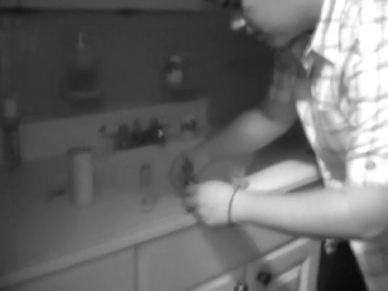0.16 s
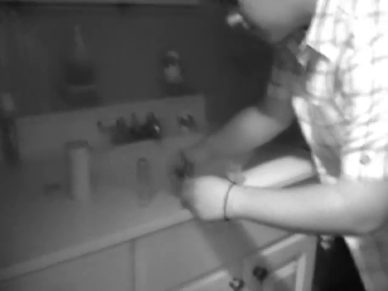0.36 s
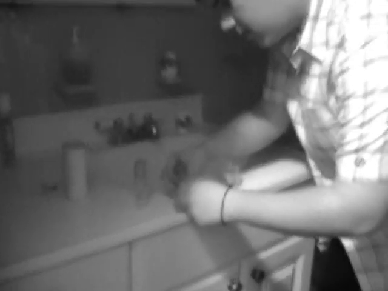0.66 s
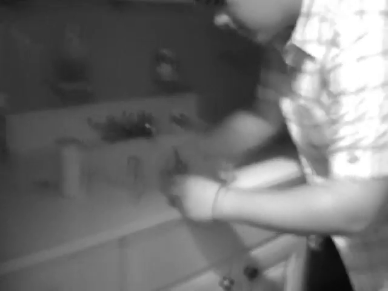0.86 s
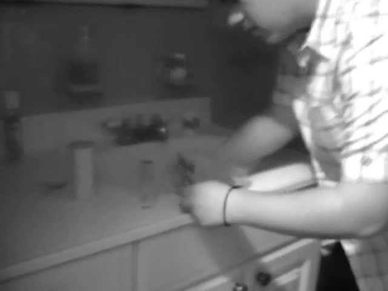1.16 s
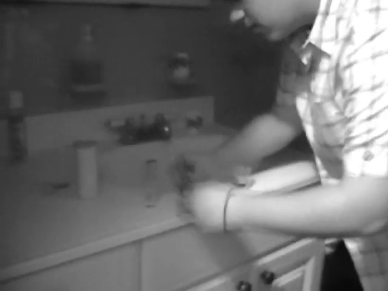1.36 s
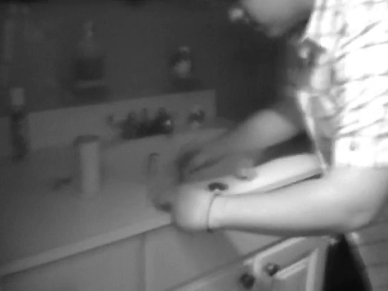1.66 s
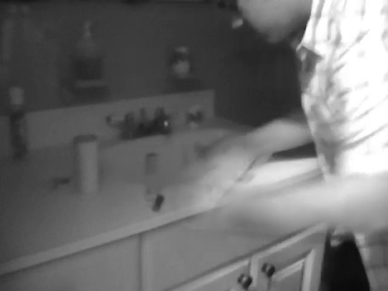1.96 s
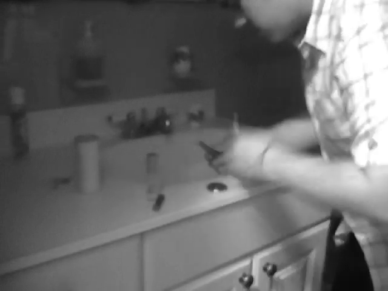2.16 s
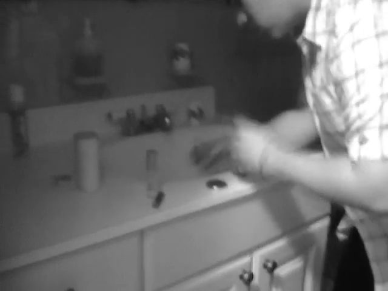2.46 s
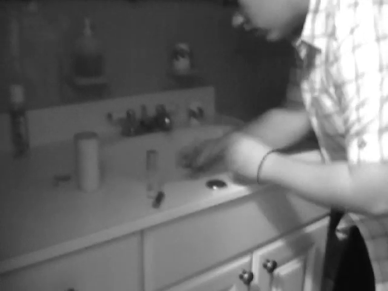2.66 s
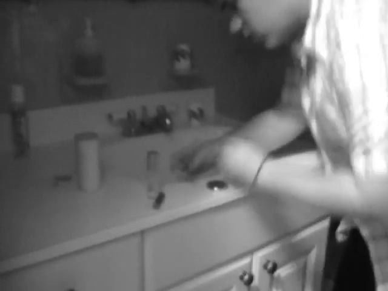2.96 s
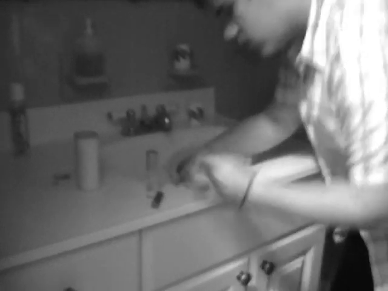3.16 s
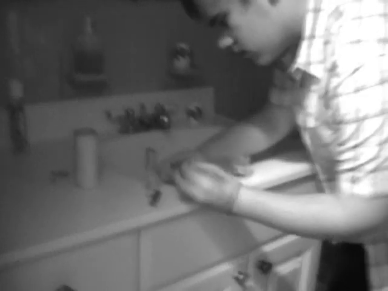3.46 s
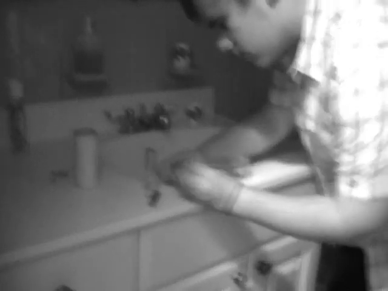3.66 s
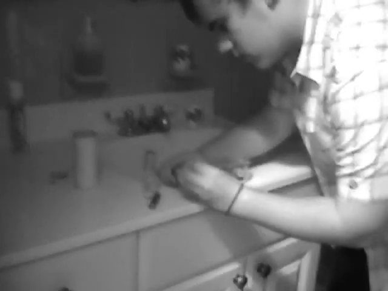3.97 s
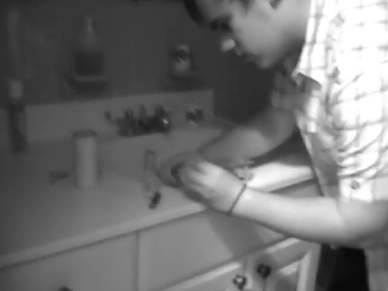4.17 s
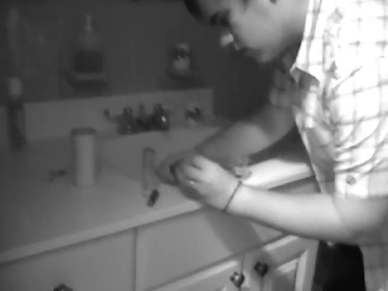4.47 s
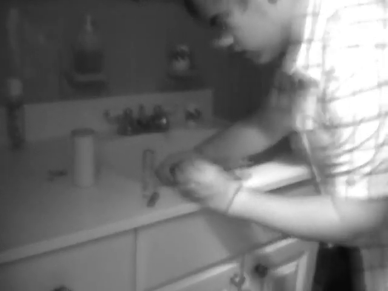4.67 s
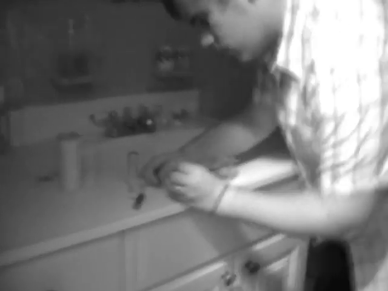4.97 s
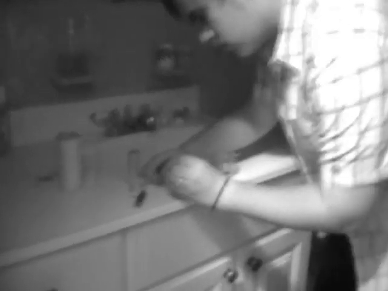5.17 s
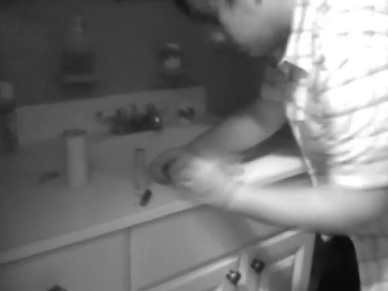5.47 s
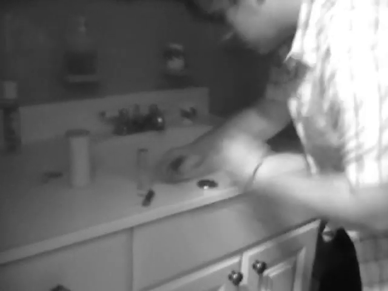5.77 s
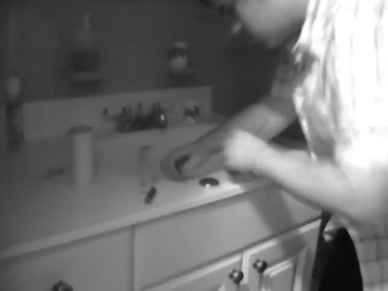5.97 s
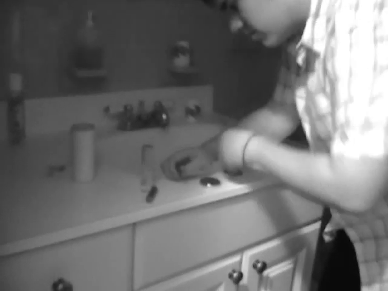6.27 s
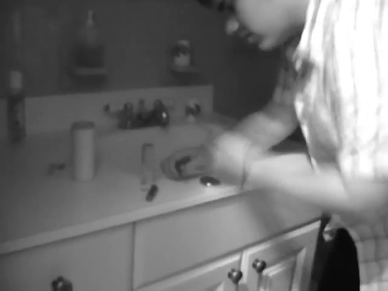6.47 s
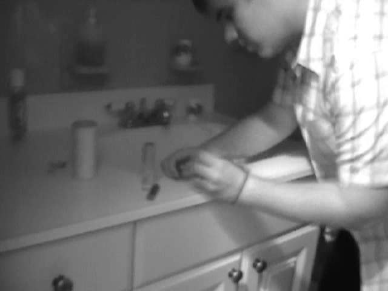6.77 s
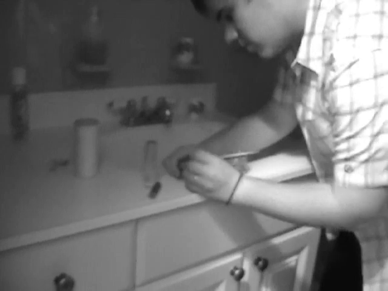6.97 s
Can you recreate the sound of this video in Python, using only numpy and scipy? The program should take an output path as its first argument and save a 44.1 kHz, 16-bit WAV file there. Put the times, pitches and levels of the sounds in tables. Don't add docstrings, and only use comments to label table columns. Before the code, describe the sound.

Someone handles small hard objects at a bathroom counter, recorded close in stereo. Cloth hisses faintly over steady rumble, mains hum and airy duct moan. First comes one dull crack, then a sharp metallic triple tap, then a quick rattling cap with a thin high ring. After a quiet pause of only room tone, the cap rattles down again and its rim clicks as it is picked up.

```python
import sys
import numpy as np
from scipy import signal
from scipy.io import wavfile
from scipy.ndimage import uniform_filter1d

SR = 44100
rng = np.random.default_rng(int(sys.argv[2]) if len(sys.argv) > 2 else 0)


def file_out(sig):
    cols = np.atleast_2d(sig).T
    lim = np.clip(cols, -1, 1)
    pcm = np.round(lim * 32767).astype(np.int16)
    wavfile.write(sys.argv[1], SR, pcm)


def nominal_scale(level):
    x = np.asarray(level, float) / 20
    return 10 ** x


N = 313330


def evened(x):
    return x / np.sqrt(np.mean(x ** 2) + 1e-20)


def read(points, hz):
    f, value = np.transpose(points)
    return np.interp(np.log(hz + 1), np.log(f + 1), value)


def sides(pan_db):
    return nominal_scale(np.array([[pan_db / 2], [-pan_db / 2]]))


def add(mix, start_s, sound):
    part = mix[:, round(start_s * SR):][:, :sound.shape[1]]
    part += sound[:, :part.shape[1]]


# frequency in Hz, left-right difference in dB.
LEAN = [(60, 6), (240, -1.5), (950, 1.0), (3770, 1.5), (15000, 0)]


def noise(colour, same, patchy_db):
    frames, hz = N // 256 + 5, np.fft.rfftfreq(1024, 1 / SR)
    a, b, c, d, patches = rng.standard_normal((frames, 513, 5)).T
    patches = uniform_filter1d(patches, size=8, axis=0)
    patches = evened(uniform_filter1d(patches, size=20, axis=1))
    same = np.clip(read(same, hz), -1, 1)[:, None]
    left = a + 1j * b
    right = same * left + np.sqrt(1 - same ** 2) * (c + 1j * d)
    lean_db = read(LEAN, hz)[:, None] / 2
    level_db = read(colour, hz)[:, None] + patchy_db * patches
    z = np.array([left, right]) * nominal_scale(level_db + np.array([lean_db, -lean_db]))
    return evened(signal.istft(z, nperseg=1024, noverlap=768)[1][:, :N])


# frequency in Hz, left-right correlation.
SAME = [(60, 0.48), (130, 0.65), (290, 0.45), (640, 0.083), (1410, 0.25), (3100, 0.11), (6820, 0.31),
        (15000, 0.4)]
# frequency in Hz, level in dB per Hz.
RUMBLE_COLOUR = [(15, -64), (25, -27), (64, -32.5), (88, -18), (118, -10), (166, -9), (226, -5),
                 (308, -6.5), (368, -4), (433, -7.5), (726, -10), (1200, -23.5), (1560, -50), (2640, -120)]


def rumble():
    return nominal_scale(-58.5) * noise(RUMBLE_COLOUR, SAME, patchy_db=-0.7)


# frequency in Hz, level in dB per Hz.
FIZZ_COLOUR = [(590, -17), (1000, -0.5), (1770, -6.5), (1910, -7), (2080, -10), (2250, -7), (3300, -13.5),
               (6180, -20.5), (6630, -23), (7700, -21.5), (11400, -23.5), (14800, -27), (16000, -39)]


def fizz():
    return nominal_scale(-63) * noise(FIZZ_COLOUR, SAME, patchy_db=-0.8)


# frequency in Hz, level in dB, left-right difference in dB.
HUM = [(54.2, -81, -0.5), (120, -59, -4), (223, -75.5, -3), (840, -78, 11), (1083, -83, 0.5),
       (1241, -90, -1.5), (1940, -85, -6), (2190, -104, -24), (2720, -84, -1.5), (6150, -92.5, -1),
       (7827, -88.5, 10), (9862, -96, 13)]


def hum():
    t, out = np.arange(N) / SR, np.zeros((2, N))
    for k, (hz, db, pan_db) in enumerate(HUM):
        waver = np.interp(t, np.linspace(0, N / SR, num=90), rng.standard_normal(90))
        waver_db = 0.6 if k == 1 else 3.0
        level = nominal_scale(db + 3 + waver_db * waver)
        out += level * sides(pan_db) * np.sin(2 * np.pi * hz * t + k)
    return out


# time in seconds, frequency in Hz, level in dB.
FAN = [(0, 352, -92), (0.598, 354.8, -63), (1.1, 362.6, -69.5), (1.5, 361.8, -61), (2.2, 364, -62),
       (2.8, 368, -67.5), (3.35, 369.9, -55.5), (4.2, 367, -65), (4.7, 363.9, -61), (5.35, 361, -57),
       (5.75, 363.5, -64.5), (6.3, 364, -59.5), (6.9, 365, -65), (7.1, 364, -64)]


def flutter_curve():
    slow = uniform_filter1d(rng.standard_normal(N), size=2000)
    return evened(uniform_filter1d(slow, size=2000))


def fan():
    s, *columns = np.transpose(FAN)
    hz, db = (np.interp(np.arange(N) / SR, s, c) for c in columns)
    octave_db = -74 + 0.3 * (db - np.median(db))
    flutter, drift = flutter_curve(), flutter_curve()
    phase = 2 * np.pi * np.cumsum(hz) / SR + 0.63 * drift
    blade = nominal_scale(db) * sides(-1.68) * np.sin(phase)
    octave = nominal_scale(octave_db) * sides(-1.64) * np.sin(2 * phase)
    return nominal_scale(2.5 + 1.03 * flutter) * (blade + octave)


# frequency in Hz, level in dB per Hz.
DUCT_COLOUR = [(130, -38), (180, -6), (226, 3.5), (275, -4.5), (340, -50.5)]


def duct():
    grows_s, grows_db = (1.8, 3.5), 7
    level_db = -71.5 + np.interp(np.arange(N) / SR, grows_s, [0, grows_db])
    return nominal_scale(level_db) * noise(DUCT_COLOUR, SAME, patchy_db=5.0)


# peak in seconds, level in dB, rise in seconds, fall in seconds.
SLEEVE = [(.03, -69.5, .3, .2), (.22, -60, 0.33, .12), (.46, -64, 0.42, 0.29), (.70, -80, 0.055, 0.034),
          (.9, -70, 0.21, 0.2), (1.675, -64.5, .2, 0.0085), (2.76, -62, .02, .3), (3.2, -73, 0.23, 0.16),
          (6.58, -77, 0.38, 0.18), (6.78, -70, .05, .5), (7.09, -74, 0.13, .05)]
# frequency in Hz, level in dB per Hz.
SLEEVE_COLOUR = [(800, 0), (2000, 0.5), (4500, -1.5), (9000, -6), (15000, -13)]


def sleeves():
    t, level = np.arange(N) / SR, 0
    span_db = 18
    for s, db, rise_s, fall_s in SLEEVE:
        level = level + nominal_scale(db - span_db * np.maximum((s - t) / rise_s, (t - s) / fall_s))
    return level * noise(SLEEVE_COLOUR, [(1000, 0.96), (10000, 0.66)], patchy_db=0.6)


# frequency in Hz, t60 in seconds.
ROOM = [(150, 0.93), (500, 0.46), (1400, 0.43), (3700, .42), (9700, 0.35), (16000, 0.45)]


def room(x):
    level_db, side_db = 4.5, -8
    early_db, early_s = 5.5, 0.067
    length = SR // 2
    t = np.arange(length) / SR
    hz, frame_s, z = signal.stft(rng.standard_normal((2, length)), SR, nperseg=128)
    decay = nominal_scale(-60 * frame_s / read(ROOM, hz)[:, None])
    tail = signal.istft(z * decay, SR, nperseg=128)[1][:, :length]
    tail *= np.clip(t / 0.0051 - 0.3, 0, 1)
    tail *= nominal_scale(early_db * np.exp(-t / early_s))
    mid, side = tail / np.linalg.norm(tail[0]) * nominal_scale(np.array([[level_db], [level_db + side_db]]))
    return signal.fftconvolve(x[None], np.array([mid + side, mid - side]), axes=1)[:, :len(x)]


def click(colour, lasts_s):
    log_gain = np.log(nominal_scale(read(colour, abs(np.fft.fftfreq(4096, 1 / SR)))))
    clean = np.fft.ifft(np.exp(np.conj(signal.hilbert(log_gain)))).real[:2048]
    chatter = rng.standard_normal(512) * np.exp(-np.arange(512) / SR / lasts_s)
    rough = np.convolve(clean, chatter / np.linalg.norm(chatter))[:2048]
    return np.array([clean, rough]) / abs(rough).max()


def modes(table):
    hz, width_hz, db = np.transpose(table)[:, :, None]
    t = np.arange(SR // 3) / SR
    sense = (-1.) ** np.arange(len(table))[:, None]
    rise = np.clip(t * hz, 0, 1)
    envelope = sense * nominal_scale(db) * width_hz * rise * np.exp(-np.pi * width_hz * t)
    shape = (envelope * np.sin(2 * np.pi * hz * t)).sum(0)
    return shape / abs(shape).max()


# start in seconds, level in dB, pitch in Hz, t60 in seconds.
TICKS = [(.69, -66, 9720, .012), (.7761, -56, 9500, 0.0048), (1.284, -58, 170, 0.11),
         (1.328, -61.5, 140, 0.2), (1.627, -58, 1610, .045), (1.784, -45, 1677, 0.035),
         (6.07, -69, 4260, 0.064), (1.9784, -59, 1627, 0.12), (1.9786, -66, 8570, 0.05),
         (1.9784, -55, 5500, 0.0029), (2.1535, -61, 5000, .005), (6.7692, -66, 6500, .004)]


def ticks():
    out = np.zeros((2, N))
    for s, db, hz, t60_s in TICKS:
        width_hz = np.log(1000) / np.pi / t60_s
        add(out, s, nominal_scale(db) * sides(1) * modes([(hz, width_hz, 0)]))
    return out + room(out.mean(0))


def drop(rows, crack, spot, ring, lasts_s, pan_db):
    tones_sent_db, ring_sent_db = -4.5, -8.5
    start, near, sent = rows[0][0], np.zeros((1, SR)), np.zeros((1, SR))
    knock, ringing = modes(spot), modes(ring)
    for s, crack_db, knock_db, ring_db in rows:
        clean, rough = nominal_scale(crack_db) * click(crack, lasts_s)
        body, bell = nominal_scale(knock_db) * knock, nominal_scale(ring_db) * ringing
        add(near, s - start, rough[None])
        add(near, s - start, (body + bell)[None])
        add(sent, s - start, clean[None])
        add(sent, s - start, (nominal_scale(tones_sent_db) * body + nominal_scale(ring_sent_db) * bell)[None])
    no_bass = signal.butter(3, 120, "high", fs=SR, output="sos")
    return start, signal.sosfilt(no_bass, sides(pan_db) * near + room(sent[0]))


# start in seconds, crack in dB, counter knock in dB, ring in dB.
PART = [
    (1.2440, -24.5, -40, -30),
    (1.2450, -51, -34.5, -28.5),
    (1.2550, -53, -32.5, -62),
    (1.2682, -57, -39, -56),
    (1.2858, -58, -61, -37),
    (1.2885, -39, -51, -40),
]
# frequency in Hz, level in dB per Hz.
PART_CRACK = [(59, -37), (100, -18), (295, -8), (768, -18), (1060, -8), (1200, -14), (2930, -20),
              (7940, -24.5), (16000, -36)]
# frequency in Hz, width in Hz, level in dB.
PART_SPOT = [(146.3, 20, 5), (291, 31, -16), (844, 85, -4.5), (984, 107, -2), (1415, 38, -1),
             (1603, 23, -2.5), (1950, 60, -11.5)]
# frequency in Hz, width in Hz, level in dB.
PART_RING = [(6500, 530, -5.5), (9500, 400, 2)]


def part():
    return drop(PART, PART_CRACK, PART_SPOT, PART_RING, lasts_s=0.00086, pan_db=4.0)


# start in seconds, crack in dB, counter knock in dB, ring in dB.
CELL = [
    (1.6783, -15, -40, -17),
    (1.6815, -18, -36, -15.5),
    (1.7248, -19.5, -50, -19),
    (1.7512, -36, -32, -29),
    (1.7545, -24, -59, -29),
    (1.7710, -28.5, -43, -33),
]
# frequency in Hz, level in dB per Hz.
CELL_CRACK = [(180, -44.5), (300, -14.5), (600, -8.5), (1250, -15), (1690, -3.5), (2400, -3.5),
              (3600, -9.5), (5600, -4), (7950, -3), (16000, -21.5)]
# frequency in Hz, width in Hz, level in dB.
CELL_SPOT = [(480, 49, -28), (1140, 250, -8.5), (1690, 48, -9.5), (2020, 150, -20), (2460, 60, -9)]
# frequency in Hz, width in Hz, level in dB.
CELL_RING = [(5500, 1000, -11), (7100, 1000, -13), (7890, 580, -0.5)]


def cell():
    return drop(CELL, CELL_CRACK, CELL_SPOT, CELL_RING, lasts_s=0.0011, pan_db=4.0)


# frequency in Hz, width in Hz, level in dB.
CAP_RING = [(4045, 35, -13), (8055, 20, 4), (8155, 30, -10), (10700, 120, -34), (11820, 60, -22),
            (13550, 100, -28), (14700, 150, -34)]
# start in seconds, crack in dB, counter knock in dB, ring in dB.
CAP_FIRST = [(2.4492, -33.5, -30, -34.5), (2.4572, -31, -24, -41), (2.4663, -26, -25, -25),
             (2.4748, -24.5, -50, -19.5), (2.4925, -23, -20.5, -20.5), (2.5121, -13, -11.5, -31),
             (2.5190, -46, -17.5, -43), (2.5275, -27, -25.5, -46), (2.5390, -37, -18.5, -75),
             (2.5450, -31, -23, -39), (2.5520, -47, -26, -46), (2.5650, -25, -29, -56),
             (2.6695, -35, -61, -54)]
# frequency in Hz, level in dB per Hz.
CAP_CRACK = [(250, -34), (800, 7), (2000, 7), (3500, 2), (5000, -5.5), (6500, -13), (10000, -14),
             (14000, -14.5), (16000, -21)]
# frequency in Hz, width in Hz, level in dB.
FIRST_SPOT = [(132, 29, -17), (177, 25, -22), (239, 40.1, -18), (325.7, 40, -15), (372, 43, -9.5),
              (491, 41, -13.5), (579, 13, -7.5), (681, 25, -14), (769, 11, 2), (984, 8.2, -19),
              (1060, 29, -11), (1082, 16, -3.5), (1314, 60, -9.5), (1353, 26, -0.5), (1414, 20, -3.5),
              (1516, 38, 0.5), (1693, 50, -9), (1760, 9.7, -11), (1930, 10, -27), (2180, 17, -41),
              (2325, 21, -5.5), (2610, 50, -11), (3332, 34, -16.5)]


def cap_first():
    return drop(CAP_FIRST, CAP_CRACK, FIRST_SPOT, CAP_RING, lasts_s=0.0046, pan_db=2.2)


# start in seconds, crack in dB, counter knock in dB, ring in dB.
CAP_AGAIN = [(5.8730, -20, -20, -58), (5.8808, -50, -32, -35.5), (5.8880, -30.5, -23, -68),
             (5.9000, -37, -37, -57), (5.9220, -30.5, -23, -60), (5.9718, -26, -27, -36.5),
             (5.9810, -30, -24.5, -53), (5.9880, -28, -34, -31), (5.9955, -25, -22, -32.5),
             (6.0010, -39, -22, -31), (6.0085, -21.5, -21.5, -58), (6.0170, -45, -32, -39),
             (6.0260, -33.5, -22.5, -49), (6.0340, -44, -18.5, -37), (6.0555, -33, -24, -34),
             (6.0600, -43, -28, -28.5), (6.0690, -32, -36, -35), (6.0800, -42, -51, -31.5),
             (6.0920, -71, -45, -37)]
# frequency in Hz, level in dB per Hz.
AGAIN_CRACK = [(250, -29), (800, -9.5), (1500, 1), (2500, 1.5), (3300, -10.5), (5000, -14), (6500, -17),
               (10500, -19), (14000, -20), (16000, -25)]
# frequency in Hz, width in Hz, level in dB.
AGAIN_SPOT = [(170, 19, -15), (236, 40, -29), (317, 48, -13), (373, 21, -11), (437, 56, -13), (488, 15, -6),
              (557.5, 21, -6.5), (702, 28, -5), (780, 25, -4.5), (930, 38, -8), (1032, 17, -7),
              (1057, 16.6, -0.5), (1341, 59, 3), (1360, 30, -10), (1422, 14, 1.5), (1509, 32, 2.5),
              (1670, 22, -1.5), (1717, 28, -12), (1890, 12, -8), (2160, 27, -29), (2330, 15, -26),
              (2610, 24, -14), (3177, 80, -47)]


def cap_again():
    return drop(CAP_AGAIN, AGAIN_CRACK, AGAIN_SPOT, CAP_RING, lasts_s=0.0028, pan_db=-1.2)


# start in seconds, crack in dB, counter knock in dB, ring in dB.
CAP_LIFT = [
    (6.1791, -33, -31.5, -33.5),
    (6.1840, -58, -57, -43),
    (6.2030, -66, -58, -54),
]
# frequency in Hz, level in dB per Hz.
LIFT_CRACK = [(1200, -53), (2500, 8), (4400, -0.5), (6500, 5.5), (9000, 7), (12000, -2), (16000, -8)]
# frequency in Hz, width in Hz, level in dB.
LIFT_SPOT = [(3230, 130, -4), (4360, 150, -3.5), (6240, 180, -6)]


def cap_lift():
    return drop(CAP_LIFT, LIFT_CRACK, LIFT_SPOT, CAP_RING, lasts_s=0.0013, pan_db=4.0)


def scene():
    mix = rumble() + fizz() + hum() + fan() + duct() + sleeves() + ticks()
    for thing in (part, cell, cap_first, cap_again, cap_lift):
        add(mix, *thing())
    return mix


def low_pass(x):
    return signal.sosfilt(signal.butter(12, 17040, fs=SR, output="sos"), x)


def record(dry):
    drum_samples = 147
    now, delayed = np.zeros(drum_samples + 1), np.zeros(drum_samples + 1)
    now[0], delayed[-1] = 1, 1
    notched = signal.lfilter(now - 0.93 * delayed, now - 0.68 * delayed, dry)
    band_limit = signal.firwin(255, 15850, window=("kaiser", 7), fs=SR)
    limited = signal.oaconvolve(notched, band_limit[None], "same")
    return low_pass(limited * 0.89)


dry = scene()
out = record(dry)
file_out(out)
```